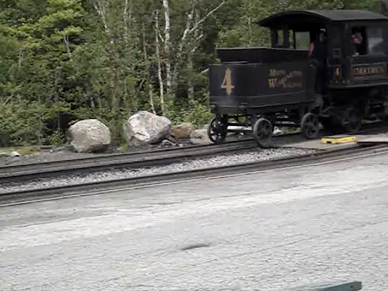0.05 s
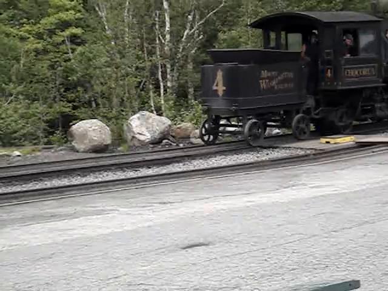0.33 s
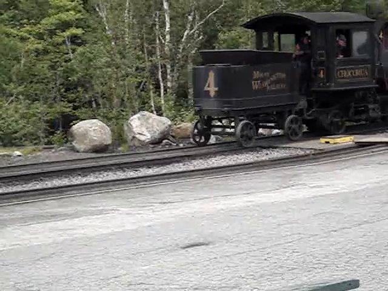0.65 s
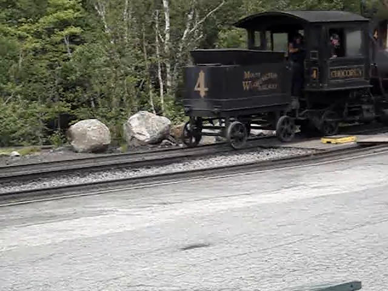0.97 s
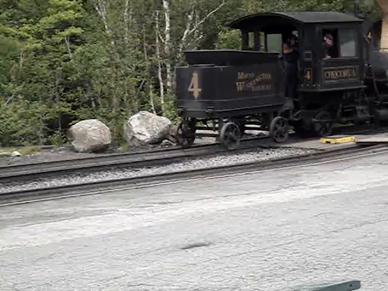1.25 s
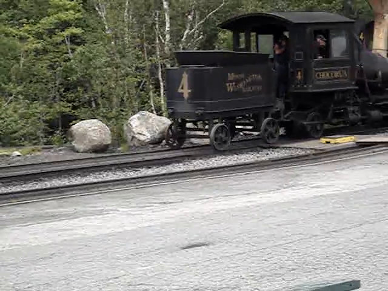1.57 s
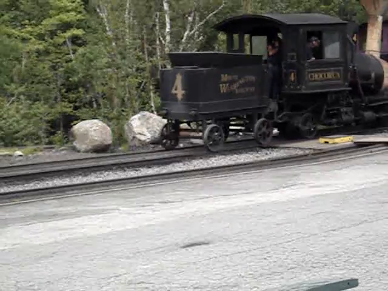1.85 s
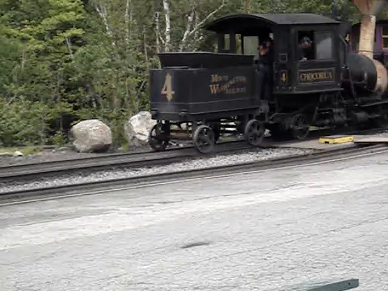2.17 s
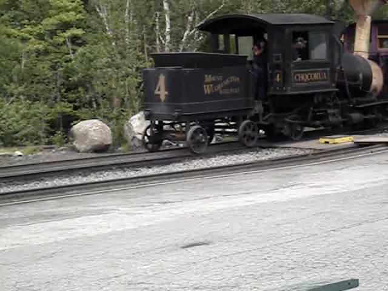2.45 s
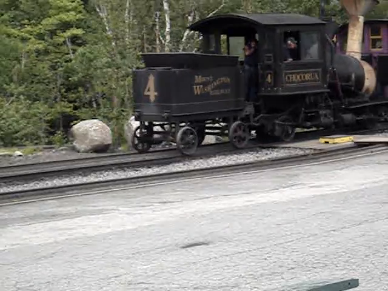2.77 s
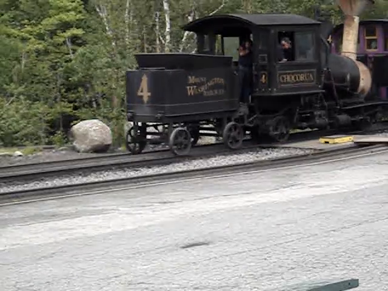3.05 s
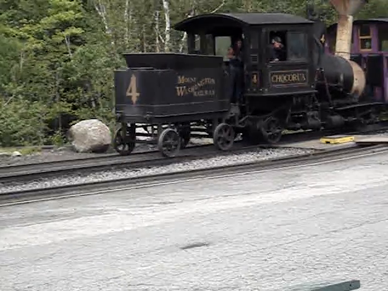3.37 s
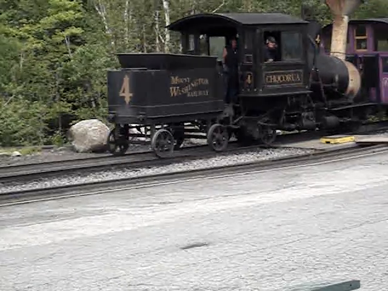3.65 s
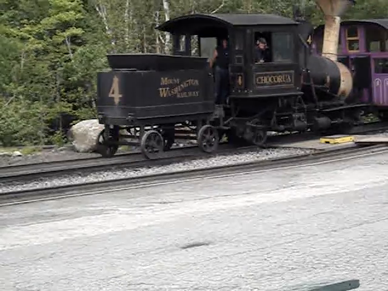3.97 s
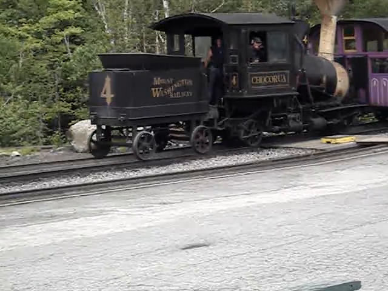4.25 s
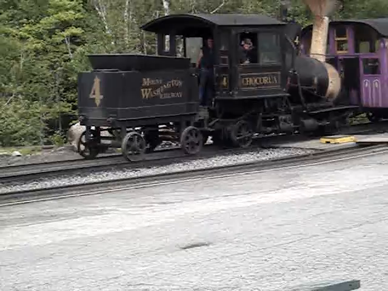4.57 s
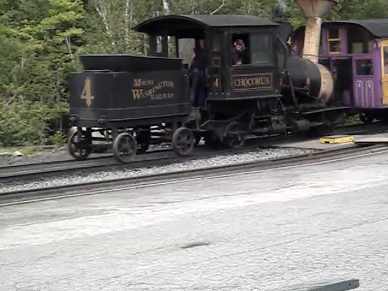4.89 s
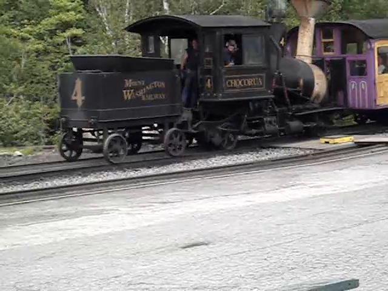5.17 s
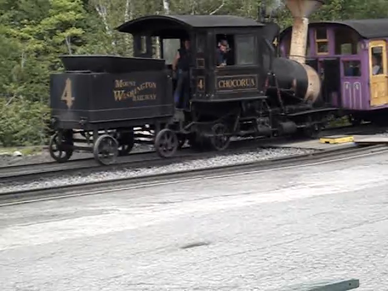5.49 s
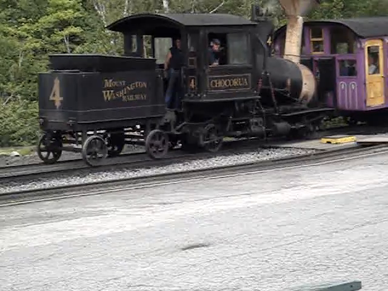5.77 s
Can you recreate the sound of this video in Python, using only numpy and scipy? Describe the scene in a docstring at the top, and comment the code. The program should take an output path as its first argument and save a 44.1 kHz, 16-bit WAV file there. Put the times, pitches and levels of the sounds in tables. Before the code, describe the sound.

A small steam locomotive rolls slowly past, hissing steadily with soft rhythmic pulses over a hollow roar of steam.

```python
"""A small steam locomotive rolls slowly past a station forecourt.
Turbulent steam roars through the resonant pipework, a brighter jet at the cylinders swells with
every piston stroke, and the running gear rumbles. A reflection off the ground interferes with the
direct sound, forming a comb that sweeps downward as the engine nears. Late on, a leak whistles faintly."""
import sys
import numpy as np
from scipy import signal
from scipy.fft import rfft, irfft
from scipy.io import wavfile
from scipy.ndimage import map_coordinates

SR = 44100
rng = np.random.default_rng(int(sys.argv[2]) if len(sys.argv) > 2 else 0)


def file_out(sig):
    """Save sig as 16-bit WAV at sys.argv[1]."""
    # one column per channel
    cols = np.atleast_2d(sig).T
    # limit, then scale
    lim = np.clip(cols, -1, 1)
    pcm = np.round(lim * 32767).astype(np.int16)
    wavfile.write(sys.argv[1], SR, pcm)


N = 257103
TIME = np.arange(N) / SR
FREQS = np.maximum(np.arange(N // 2 + 1) * SR / N, 1)
START_TURNS_PER_S, SLOWING_TURNS_PER_S2 = 2.66, 0.03


def from_db(db):
    """Amplitude ratio of a level: a factor of ten for every 20 dB."""
    return 10 ** (np.asarray(db) / 20)


def in_time(rows):
    """Linear interpolation of each column after the time column, sample by sample."""
    times, *columns = np.transpose(rows)
    return [np.interp(TIME, times, column) for column in columns]


def resonance(centre_hz, width_hz):
    """Lorentzian curve of a damped resonator: 1 at its centre, 1/2 at half a width to either side."""
    return 1 / (1 + (2 * (FREQS - centre_hz) / width_hz) ** 2)


def response(colour, modes=()):
    """Frequency response: resonant modes raise peaks on a broad spectral envelope."""
    hz, db = np.transpose(colour)
    lift = sum(lift_db * resonance(centre, width) for centre, width, lift_db in modes)
    return from_db(np.interp(np.log(FREQS), np.log(hz), db) + lift)


def noise(gain):
    """Spectral shaping: white noise weighted by a gain per frequency, scaled to unit power."""
    shaped = irfft(rfft(rng.standard_normal(N)) * gain, N)
    return shaped / np.sqrt(np.mean(shaped ** 2) + 1e-20)


def flutter(rate_hz, depth_db):
    """Random amplitude modulation, as of eddies in a flow: a gain that wanders around 1."""
    return from_db(depth_db * noise(resonance(rate_hz, 2 * rate_hz)))


def crank_turns():
    """Uniformly decelerated rotation: the turns of the crank so far."""
    return START_TURNS_PER_S * TIME - SLOWING_TURNS_PER_S2 * TIME ** 2 / 2


def each_turn(strokes, edge_s=0.034):
    """Periodic modulation: a lift in dB that ramps in, holds and ramps out at set crank angles."""
    lift = 0
    for start, length, lift_db in strokes:
        from_middle = np.abs((crank_turns() - start - length / 2 + .5) % 1 - .5)
        inside_s = (length / 2 - from_middle) / START_TURNS_PER_S
        lift = lift + lift_db * np.clip(.5 + inside_s / edge_s, 0, 1)
    return lift


def steam(highs_db, lows_db, gain, split_hz, flutter_hz, band_flutter_db):
    """Turbulent jet noise: small eddies radiate the highs, large ones the lows, and the flow flutters."""
    low_share = 1 / (1 + (FREQS / split_hz) ** 20)
    highs = from_db(highs_db) * noise(gain * np.sqrt(1 - low_share)) * flutter(flutter_hz, band_flutter_db)
    lows = from_db(lows_db) * noise(gain * np.sqrt(low_share)) * flutter(flutter_hz, band_flutter_db)
    return (highs + lows) * flutter(flutter_hz, depth_db=0.38)


def pipework(highs_trim_db=-1.0, lows_trim_db=-0.5):
    """Pipe resonance: modes colour the flow noise into a hollow roar that surges twice a turn."""
    # roar before trim and surges: (time [s], level of highs [dB], level of lows [dB])
    roar = [(0, -25, -34.5), (0.55, -26.5, -33.5), (0.85, -27, -35.5), (1.35, -25.5, -32.5),
            (1.9, -24.5, -30.5), (2.8, -26, -31.5), (3.2, -23.5, -29.5), (4.5, -24, -31),
            (5.83, -24.5, -30.5)]
    # spectral envelope of the roar: (frequency [Hz], relative level [dB])
    colour = [(350, -29), (600, -13.5), (790, -11), (880, -4), (1150, -3), (1450, -3), (1650, -1),
              (2200, -1), (2900, -4.5), (3150, -7.5), (4500, -42)]
    # modes of pipework and casing: (frequency [Hz], width [Hz], lift [dB])
    modes = [(706, 60, 5), (975, 63, 2), (1269, 95, 8.5), (1670, 130, 3), (2006, 48, 6.5), (2370, 89, 4),
             (2800, 63, 2.5)]
    # surges between the cylinder spurts: (start [turns], length [turns], lift of lows [dB])
    surges = [(0.752, 0.16, 2.0), (0.31, 0.17, 1.4)]
    sag = (0.11, 0.15, -1.6)  # same columns: the strong spurt drains the pipes
    highs_db, lows_db = in_time(roar)
    surge_db = each_turn(surges + [sag])
    return steam(highs_db + highs_trim_db + 0.55 * surge_db, lows_db + lows_trim_db + surge_db,
                 response(colour, modes), split_hz=1333, flutter_hz=12.4, band_flutter_db=0.8)


def cylinders(lows_trim_db=-1.0):
    """Pulsed jet noise: each piston stroke releases a spurt that makes the hiss louder and brighter."""
    # body of the jet before trim and spurts: (time [s], level [dB])
    body = [(0, -23.5), (0.65, -25.5), (1.4, -26.5), (2.6, -26.5), (3.8, -26.5), (4.3, -25.5),
            (5.83, -26.5)]
    # treble of the jet between spurts: (time [s], level [dB])
    sizzle = [(0, -28.5), (0.5, -27), (0.95, -28.6), (4.0, -27.5), (5.83, -27.5)]
    # spectral envelope of the jet: (frequency [Hz], relative level [dB])
    colour = [(2000, -39), (2800, -9.5), (3050, -4), (4300, -2.5), (5500, -3), (6100, -5.5), (7000, -7.5),
              (7800, -7.5), (8800, -11.5), (10200, -11)]
    # modes of the cylinder cocks: (frequency [Hz], width [Hz], lift [dB])
    modes = [(3080, 150, 2.1), (3460, 120, 2.8), (3820, 75, 2.6), (4800, 40, 1.4), (5330, 250, 2.5)]
    # a spurt from either end of the piston: (start [turns], length [turns], treble lift at vigour 1 [dB])
    spurts = [(0.886, 0.32, 3), (0.38, 0.3, 1.85)]
    # strength of the spurts, one entry a turn: (factor on the lift [1])
    vigour = [0.32, 0.54, 0.83, 1.04, 1.1, 0.97, 0.95, 0.83, 0.86, 0.84, 0.55, 0.79, 0.76, 0.82, 1, 1.5]
    lows_db, = in_time(body)
    highs_db, = in_time(sizzle)
    spurt_db = each_turn(spurts) * np.interp(crank_turns(), np.arange(len(vigour)), vigour)
    return steam(highs_db + spurt_db, lows_db + lows_trim_db + 0.69 * spurt_db,
                 response(colour, modes), split_hz=5290, flutter_hz=15, band_flutter_db=0.58)


def running_gear(trim_db=0.5):
    """Structure-borne noise: wheels and frame rumble, a little more as the rods load them once a turn."""
    # rumble before trim and thrust: (time [s], level [dB])
    rolling = [(0, -46), (0.6, -43.5), (0.9, -46), (1.8, -41.5), (3.5, -43), (3.95, -45), (4.45, -43),
               (5.83, -43.5)]
    # spectral envelope of the rumble: (frequency [Hz], relative level [dB])
    colour = [(15, -16), (35, -17), (70, -18.5), (100, -11.5), (150, -8), (210, -4), (270, -5), (330, -3.5),
              (400, 2.5), (580, 1.5), (720, -8), (1200, -38)]
    thrust = (0.42, 0.47, 1.7)  # (start [turns], length [turns], lift [dB])
    level_db, = in_time(rolling)
    rumble = noise(response(colour)) * flutter(rate_hz=12, depth_db=0.5)
    return from_db(level_db + trim_db + each_turn([thrust])) * rumble


def ground_reflection(direct, echo_ratio=0.31):
    """Comb filtering: the pavement echo lags more as the engine nears, so the notches slide down."""
    # delay of the echo behind the direct sound: (time [s], lag [ms])
    echo_lag = [(0, 1.015), (0.6, 1.01), (1.8, 1.06), (3.6, 1.085), (4.3, 1.15), (5.83, 1.2)]
    lag_ms, = in_time(echo_lag)
    echo = map_coordinates(direct, [np.arange(N) - lag_ms * SR / 1000], order=3, mode="wrap")
    return (direct + echo_ratio * echo) / np.sqrt(1 + echo_ratio ** 2)


def leak():
    """Edge tone: steam passing over an edge excites one narrow resonance, a breathy whistle."""
    # swell of the whistle: (time [s], level [dB])
    whistle = [(0, -64), (3.0, -55), (4.0, -40), (4.7, -40), (5.1, -32.5), (5.35, -41), (5.65, -32),
               (5.83, -33)]
    level_db, = in_time(whistle)
    return from_db(level_db) * noise(resonance(centre_hz=2382, width_hz=28))


def scene():
    """Superposition: the engine, its ground reflection and the leak add, alike in both ears."""
    engine = pipework() + cylinders() + running_gear()
    mix = ground_reflection(engine) + leak()
    return np.stack([mix, mix])


def record(dry, stopband_hz=10450):
    """Band limiting: a steep zero-phase low-pass removes the top of the hiss."""
    low_pass = signal.cheby2(20, 60, stopband_hz, fs=SR, output="sos")
    return signal.sosfiltfilt(low_pass, dry)


dry = scene()
out = record(dry)
file_out(out)
```